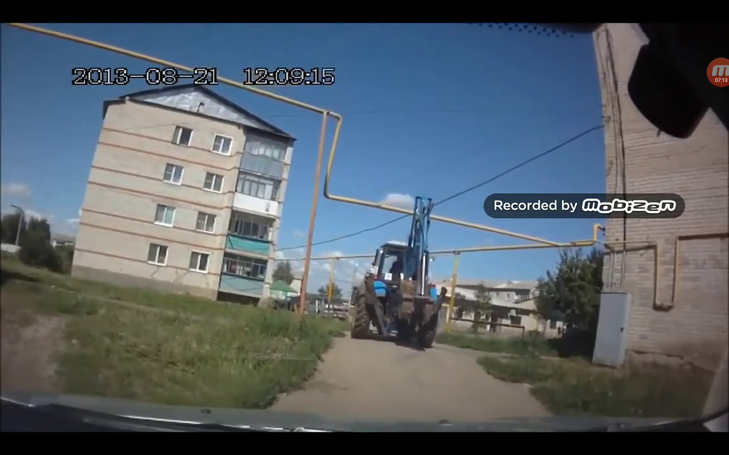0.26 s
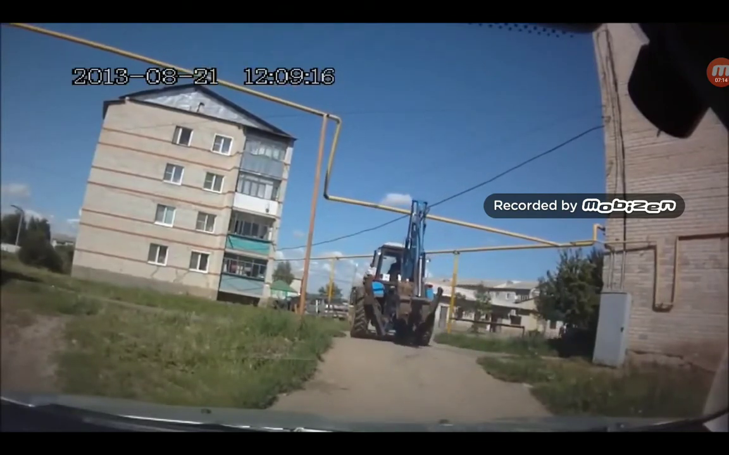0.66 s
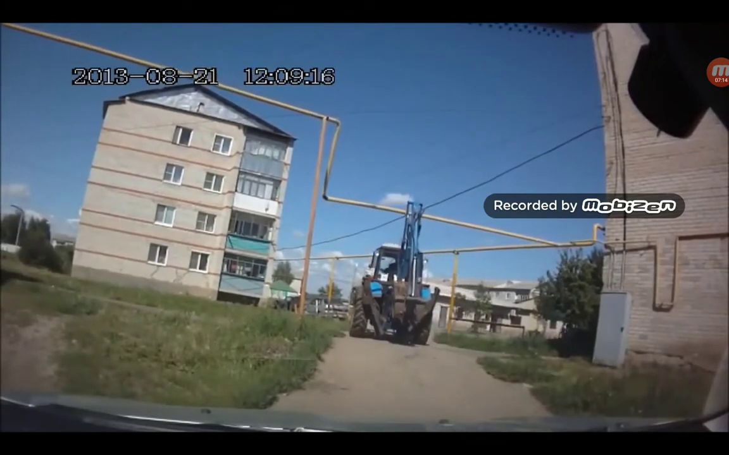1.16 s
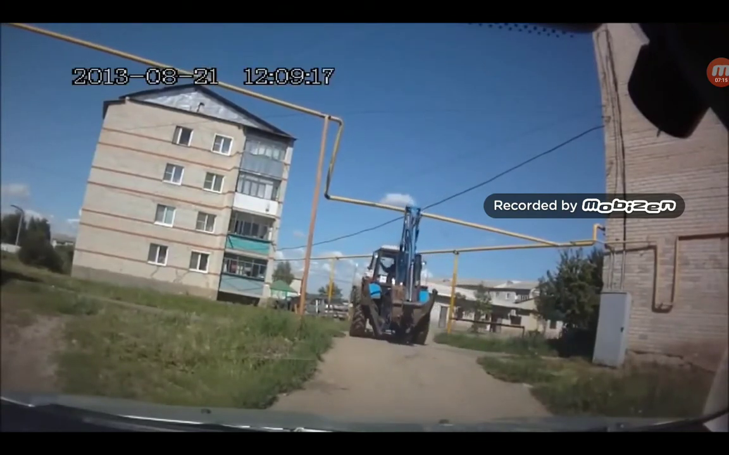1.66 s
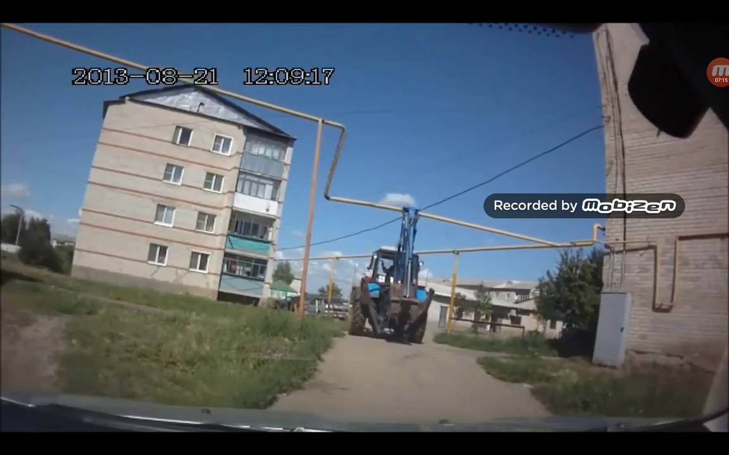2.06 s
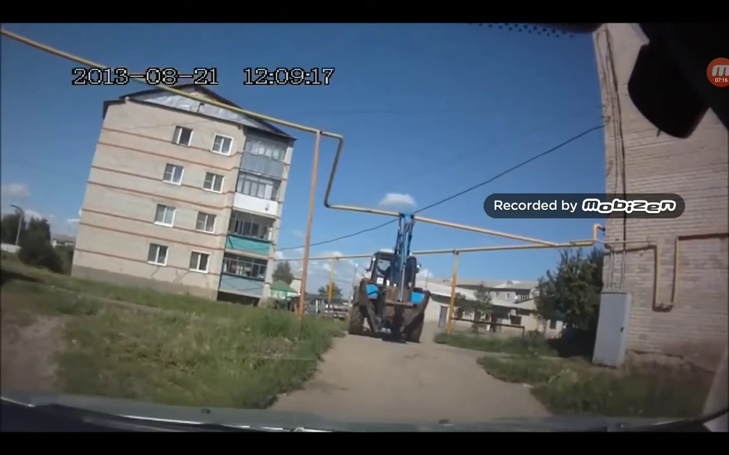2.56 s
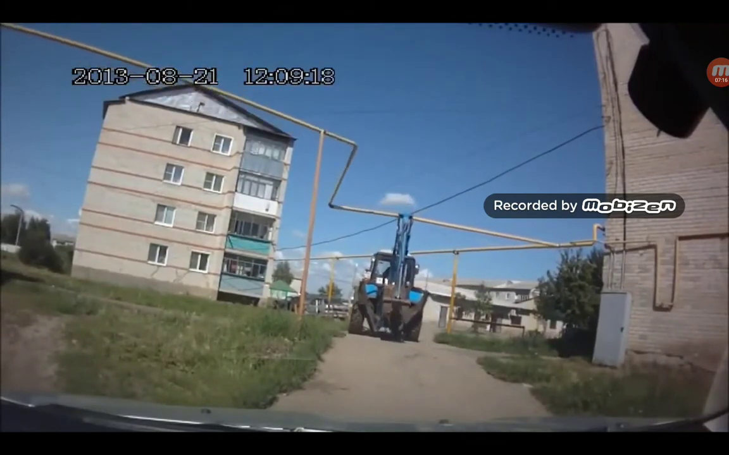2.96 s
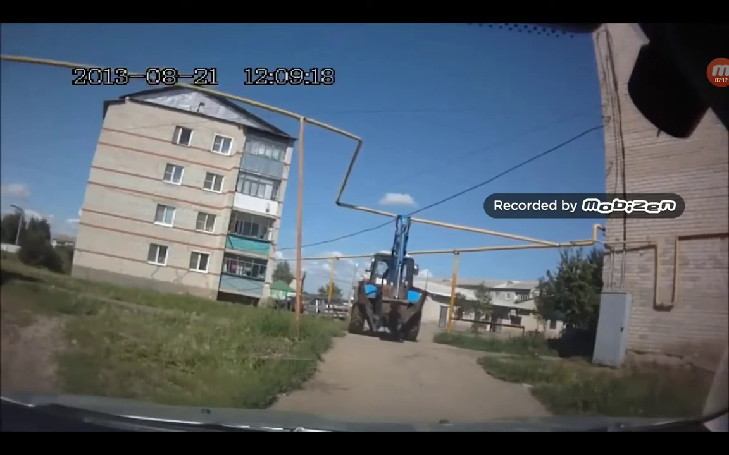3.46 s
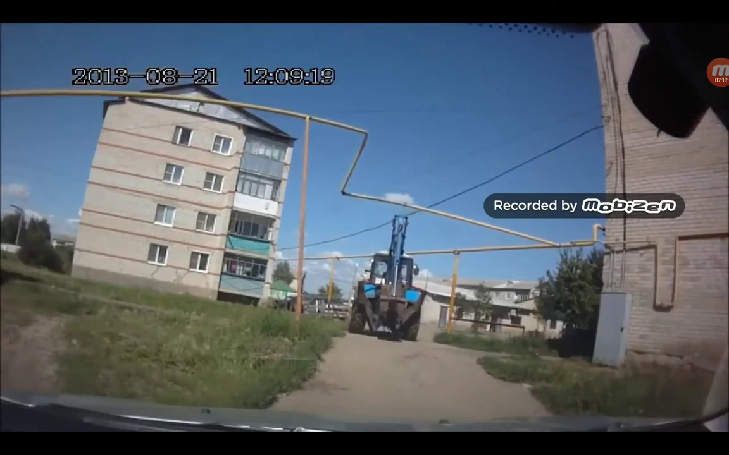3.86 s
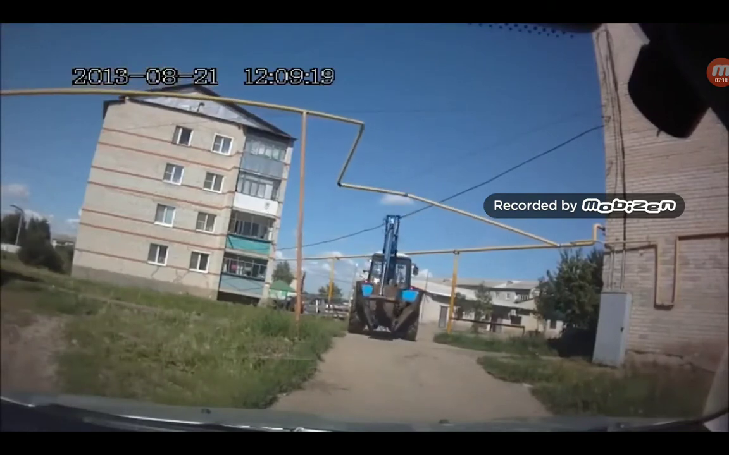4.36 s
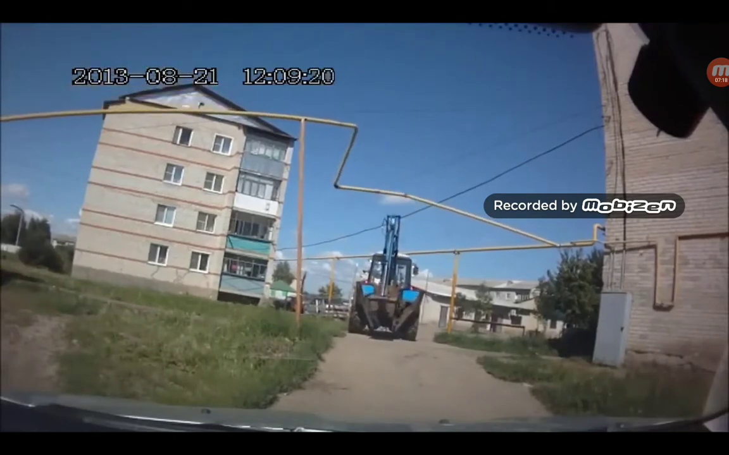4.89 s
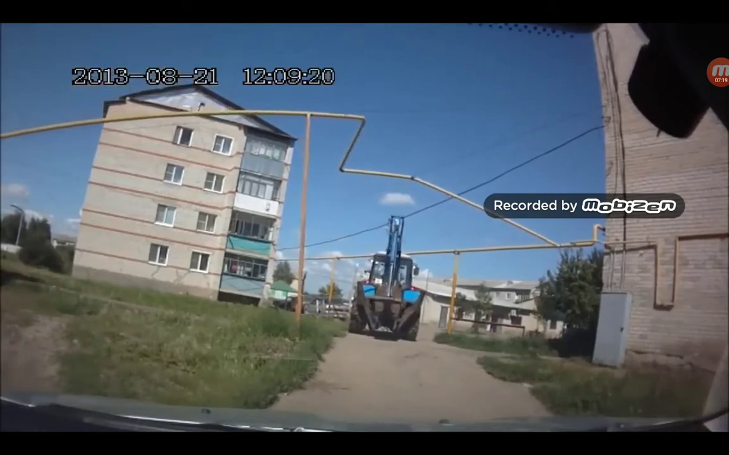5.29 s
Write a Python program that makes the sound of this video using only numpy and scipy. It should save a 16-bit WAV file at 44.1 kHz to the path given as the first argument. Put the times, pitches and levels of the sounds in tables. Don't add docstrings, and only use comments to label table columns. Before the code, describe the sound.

Inside a car crawling along a dirt lane behind a tractor, a loud two-tone horn is sounding from the very start. Its two steady notes, roughly G sharp and B above middle C, buzz together, reedy and nasal, with a gritty fizz of overload. The lower note runs slightly flat until about 0.6 s, then settles. Beneath it, loose trim rustles and clicks, with sharper knocks near 1.05, 2.24 and 3.19 s. The horn stops at about 3.36 s with a very short ring-out; rattles and a heavy, low knock at 3.59 s fill the gap. A second press sounds from 3.62 to 4.13 s. Afterwards the rough, muffled engine drone swells back, throbbing unevenly, with a hard double clack at 4.45 s and small, duller bumps near 5.13, 5.35 and 5.49 s. The sound is mono, close and boxy, with little treble and almost no reverberation.

```python
import sys
import numpy as np
from scipy import signal
from scipy.fft import rfft, irfft
from scipy.io import wavfile
from scipy.ndimage import uniform_filter1d, minimum_filter1d

SR = 44100
rng = np.random.default_rng(int(sys.argv[2]) if len(sys.argv) > 2 else 0)


def put_to_file(sound):
    columns = np.atleast_2d(sound).T
    safe = np.clip(columns, -1, 1)
    whole_steps = np.round(safe * 32767)
    wavfile.write(sys.argv[1], SR, whole_steps.astype(np.int16))


def volts_from_decibels(level):
    exponent = np.asarray(level, float) / 20
    return 10 ** exponent


N = 243861
T = np.arange(N) / SR

# (on [s], off [s], rise [s], ring-out by 60 dB [s], level [dB])
PRESSES = [
    (-.05, 3.362, 0.014, 0.16, -0.08),
    (3.621, 4.125, 0.0057, 0.093, 0.03),
]
# (multiple of the pitch, rms level [dB])
LOW_PARTIALS = [(1, -22.5), (2, -23.5), (3, -27), (4, -36.5), (5, -34), (6, -55.5), (7, -57.5)]
HIGH_PARTIALS = [(1, -32), (2, -26), (3, -24.5), (4, -27), (5, -39.5), (6, -68.5)]
# (low multiple, high multiple, rms level [dB])
CROSS_TONES = [(-1, 2, -41), (1, 1, -44.5), (1, 2, -47), (3, 1, -43.5), (4, 1, -51), (3, 2, -52),
               (1, 4, -58), (2, 5, -64), (1, 6, -61), (0, 7, -60), (1, 7, -62), (4, 5, -59), (3, 6, -61),
               (2, 7, -59), (1, 8, -59), (6, 4, -61), (4, 6, -60), (3, 7, -62)]
UNSEATED_DB = [-0.6, 0.8, -1, 3]
DULLING_DB = [1, -2.5, -0.4, -2]
# (frequency [Hz], gain [dB])
HISS_COLOUR = [(120, -36.5), (600, -2), (1080, -8.5), (1400, -8.5), (2150, -13), (2600, -15.5),
               (3300, -23.5), (4300, -16), (5000, -23), (6300, -32), (7300, -48), (9000, -48), (12000, -59),
               (14000, -78)]
# (frequency [Hz], gain [dB])
DRONE_COLOUR = [(30, -58), (80, -40.5), (112, -14.5), (361, -3), (430, -11), (700, -13.5), (1000, -25.5),
                (1400, -9), (1900, -17), (2200, -23), (2550, -32.5), (3000, -34), (3250, -48),
                (5000, -80.5)]
# (frequency [Hz], width [Hz], level [dB])
PANELS = [(388, 210, -33.5), (693, 45, -40.5), (1368, 35, -33.5), (1986, 100, -38.5), (126.5, 35, -47.5),
          (4030, 650, -65.5), (5650, 840, -84.5)]
# (time [s], drone level [dB])
LOAD = [(0, 2.5), (.15, -0.5), (1.9, -.5), (2.05, -0.5), (2.2, -0.5), (3.3, 0.5), (3.56, 1), (3.9, -2.5),
        (4.25, 1), (4.6, -1), (4.95, -0.5), (5.13, -.5), (5.35, 0), (5.53, 0.5)]
# (time [s], rustle level [dB], dying away [s])
BUMPS = [(.09, -34.5, 0.092), (.3, -43, 0.28), (.72, -36.5, .2), (1.07, -35, 0.15), (1.192, -34, 0.089),
         (2.041, -28.5, 0.18), (2.25, -24.5, .1), (3.192, -26.5, .1), (3.25, -30, .08), (3.32, -31, .08),
         (3.4, -25.5, 0.12), (3.48, -27.5, 0.09), (3.575, -30, 0.034), (4.22, -35.5, .15), (4.3, -34.5, .1),
         (4.44, -33, 0.1), (5.345, -38.5, 0.047)]
# (frequency [Hz], gain [dB])
RUSTLE_COLOUR = [(120, -34.5), (900, -2.5), (1500, -1.9), (2200, -5.5), (2550, -14.5), (3000, -17),
                 (3300, -24.5), (4300, -20), (4900, -33.5), (6300, -45.5), (7500, -61), (14000, -95)]
# (frequency [Hz], width [Hz], level [dB])
TRIM_RINGS = [(1330, 120, -6), (2150, 200, 3), (2900, 200, 7)]
# (time [s], peak level [dB], ring [Hz], fade by 60 dB [s])
KNOCKS = [(.075, -21.5, 2120, 0.06), (.095, -18, 1490, .08), (1.185, -26.5, 2255, 0.052),
          (1.05, -11, 2210, .035), (1.051, -15, 1850, .05), (2.236, -10, 1720, .06),
          (2.244, -15, 2250, .08), (3.184, -12, 2005, 0.14), (3.186, -11, 973, 0.14),
          (3.388, -27.5, 2100, 0.096), (3.418, -30.5, 2100, 0.043), (3.582, -14.5, 1925, .043),
          (3.587, -0.5, 761, 0.04), (3.59, -6, 503, .04), (3.594, -18, 280, 0.052),
          (3.576, -21, 898, 0.036), (4.299, -26, 2160, 0.054), (4.452, -7, 1990, .035),
          (4.4535, -2, 1210, .045), (4.454, -7, 608, .06), (4.481, -23, 1990, .04),
          (4.491, -17, 1990, .035), (4.539, -27.5, 1930, .043), (5.127, -18.5, 495, 0.097),
          (5.345, -26.5, 2206, .04), (5.488, -16, 316, 0.072)]
# (frequency [Hz], gain [dB])
CRACK_COLOUR = [(120, -42), (700, -5.5), (2200, 0.5), (2550, -11.5), (3000, -12.5), (3300, -25),
                (4300, -14.5), (4900, -24.5), (6300, -31), (7500, -52.5), (11000, -54), (14000, -75.5)]
# (frequency [Hz], gain [dB])
FIZZ_COLOUR = [(300, -55), (2500, -23.5), (2900, -13), (3350, -23.5), (4300, -2.5), (4750, -4.5),
               (5000, -9.5), (6300, -16), (7300, -34.5), (9000, -27), (10500, -34.5), (12000, -41.5),
               (14000, -63.5)]

LOW_HZ, HIGH_HZ = 409.3, 494.45
SEATS_S, UNSEATED_FLAT_HZ, REPRESS_FLAT_HZ = 0.62, 1.9, 0.6
UNSEATED_HIGH_DB = 1
DUCK_DB, RECOVER_S = -4, 0.27
BUMP_RISE_S, RUSTLE_REST_DB = 0.03, -43.5
SECOND_MODE_RATIO = 0.69
CRACK_DB, CRACK_DB_PER_OCTAVE = -4, 9.5


def unit(x):
    return x / np.sqrt(np.mean(x ** 2))


def colour(x, points):
    hz, db = np.transpose(points)
    grid = np.maximum(np.fft.rfftfreq(8192, 1 / SR), 1)
    log_gain = np.interp(np.log(grid), np.log(hz), db) * np.log(10) / 20
    cepstrum = irfft(log_gain)
    cepstrum[1:4096] *= 2
    cepstrum[4097:] = 0
    response = irfft(np.exp(rfft(cepstrum)))
    return signal.fftconvolve(x, response)[:len(x)]


def ring(x, hz, width_hz):
    return signal.lfilter(*signal.iirpeak(hz, hz / width_hz, fs=SR), x)


def walk(rate):
    k = int(SR / rate)
    held = np.repeat(rng.standard_normal(400)[:N // k + 1], k)[:N]
    return 1.3 * uniform_filter1d(uniform_filter1d(held, k), k)


def noise():
    return rng.standard_normal(N)


def button():
    swing = np.zeros(N)
    for on, off, rise, t60, db in PRESSES:
        up = 1 - np.exp(-np.clip(T - on, 0, None) / rise)
        after = np.clip(T - off, 0, None)
        ring_out = 0.79 * volts_from_decibels(-60 * after / t60)
        echo = 0.12 * volts_from_decibels(-60 * after / 0.35)
        swing += volts_from_decibels(db) * up * (ring_out + echo)
    return swing


def horn(phase, partials, sways_db, spread, turn, flutter_db):
    tone = np.zeros(N)
    for k, db in partials:
        k = round(k)
        sway_db = sways_db[min(k, len(sways_db)) - 1]
        level_db = db + sway_db + flutter_db * walk(7.8)
        tone += np.sqrt(2) * volts_from_decibels(level_db) * np.cos(k * phase + spread * k * k + turn)
    return tone


def horns():
    unseated = np.clip((SEATS_S - T) / 0.04 + 0.5, 0, 1)
    worn = np.zeros(N)
    for on, off, *_ in PRESSES:
        worn += np.clip((T - on) / (off - on), 0, 1) ** 2 * (T > on) * (T < off + 0.25)

    low_hz = LOW_HZ - UNSEATED_FLAT_HZ * unseated - REPRESS_FLAT_HZ * (T > PRESSES[1][0])
    high_hz = HIGH_HZ + 0.25 * walk(2.488)
    low_phase = 2 * np.pi * np.cumsum(low_hz + 0.26 * walk(25)) / SR
    high_phase = 2 * np.pi * np.cumsum(high_hz + 0.26 * walk(25)) / SR

    low_sways_db = [cold * unseated + dull * worn for cold, dull in zip(UNSEATED_DB, DULLING_DB)]
    high_sways_db = [UNSEATED_HIGH_DB * unseated + 0.4 * walk(2.5)]
    tones = horn(low_phase, LOW_PARTIALS, low_sways_db, spread=1.6, turn=1.66, flutter_db=0.4)
    tones += horn(high_phase, HIGH_PARTIALS, high_sways_db, spread=0.25, turn=3, flutter_db=0.6)

    pulsing = (1 + 1.4 * unit(tones)) * noise()
    hiss = unit(colour(pulsing, HISS_COLOUR)) * volts_from_decibels(-33.5 + 0.23 * walk(7.3))
    for m, n, db in CROSS_TONES:
        phase = round(m) * low_phase + round(n) * high_phase
        tones += np.sqrt(2) * volts_from_decibels(db + 0.5 * walk(11)) * np.cos(phase)
    return button() * (tones + hiss)


def ducking():
    shares = [(T > on) * np.exp(-np.clip(T - off, 0, None) / RECOVER_S) for on, off, *_ in PRESSES]
    return np.max(shares, axis=0)


def engines():
    beat = np.cumsum(24 * (1 + 0.06 * walk(5.6))) / SR % 1
    throb = 1 + 0.5 * np.exp(-beat / 0.12)
    firings = throb * volts_from_decibels(0.85 * walk(9)) * noise()
    drone = unit(colour(firings, DRONE_COLOUR)) * volts_from_decibels(-26.5)
    for hz, width_hz, db in PANELS:
        panel = ring(ring(throb * noise(), hz, width_hz), hz, 2 * width_hz)
        drone += unit(panel) * volts_from_decibels(db + 1.8 * walk(11))
    load_db = np.interp(T, *np.transpose(LOAD))
    return drone * volts_from_decibels(load_db + DUCK_DB * ducking())


def shaking():
    power = volts_from_decibels(2 * RUSTLE_REST_DB)
    for s, db, dying in BUMPS:
        swell = np.where(T < s, (T - s) / BUMP_RISE_S, (s - T) / dying)
        power = power + volts_from_decibels(2 * db) * np.exp(2 * swell)
    return np.sqrt(power)


def trim_rattle():
    struck = rng.random(N) < 3000 / SR
    ticks = struck * volts_from_decibels(1.2 * rng.exponential(size=N)) * noise()
    smear = np.exp(-T[:400] / 0.0066) * rng.standard_normal(400)
    rattle = unit(colour(np.convolve(ticks, smear)[:N], RUSTLE_COLOUR))
    rattle += sum(volts_from_decibels(db) * ring(rattle, hz, width_hz) for hz, width_hz, db in TRIM_RINGS)
    return rattle * shaking()


def knocks():
    out, t = np.zeros(N + 16000), T[:16000]
    rise = np.clip(t / 0.003, 0, 1)
    for s, db, hz, t60 in KNOCKS:
        first_mode = np.sin(2 * np.pi * hz * t)
        second_mode = volts_from_decibels(-8) * np.sin(2 * np.pi * SECOND_MODE_RATIO * hz * t)
        fade = volts_from_decibels(-60 * t / t60)
        crack_db = CRACK_DB + CRACK_DB_PER_OCTAVE * np.log2(hz / 2000)
        crack = unit(colour(rng.standard_normal(len(t)), CRACK_COLOUR)) * volts_from_decibels(crack_db)
        crack_fade = fade + volts_from_decibels(-10 - 60 * t / (2.5 * t60))
        blow = (first_mode + second_mode) * fade + crack * crack_fade
        out[int(s * SR):][:len(t)] += volts_from_decibels(db - 4) * rise * blow
    return out[:N]


def scene():
    return (horns() + engines() + trim_rattle() + knocks())[None]


def top_cut(x):
    return signal.sosfilt(signal.butter(12, 14170, fs=SR, output="sos"), x)


def record(dry):
    x = dry[0]
    room_left = np.minimum(1, 0.56 / (np.abs(x) + 1e-9))
    x = x * uniform_filter1d(minimum_filter1d(room_left, size=181), size=181)

    bent = np.tanh(3.2 * x + 0.5) / 4.35
    bent -= x * np.dot(bent, x) / np.dot(x, x) + bent.mean()
    housing = rng.standard_normal(900) * np.exp(-T[:900] / 0.0015)
    smeared = np.convolve(bent, housing / np.linalg.norm(housing))[:N]
    fizz = volts_from_decibels(6.5) * colour(0.43 * bent + smeared, FIZZ_COLOUR)

    low_cut = signal.butter(2, 60, "high", fs=SR, output="sos")
    heard = signal.sosfilt(low_cut, x + fizz)
    return top_cut(heard[None])


dry = scene()
out = record(dry)
put_to_file(out)
```